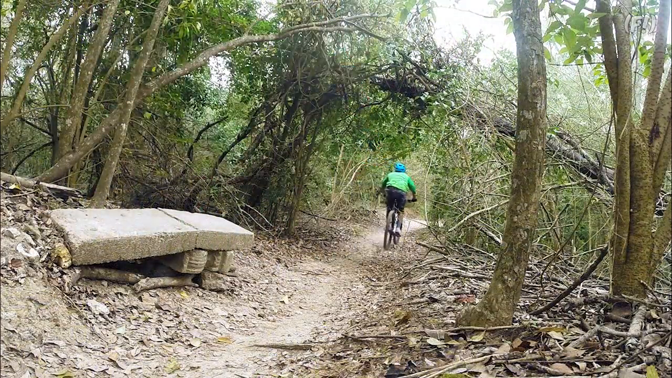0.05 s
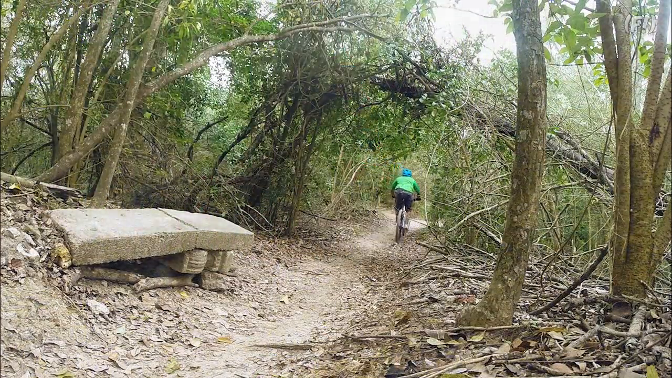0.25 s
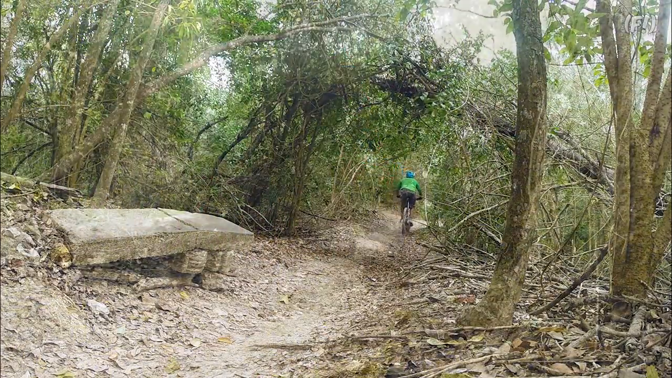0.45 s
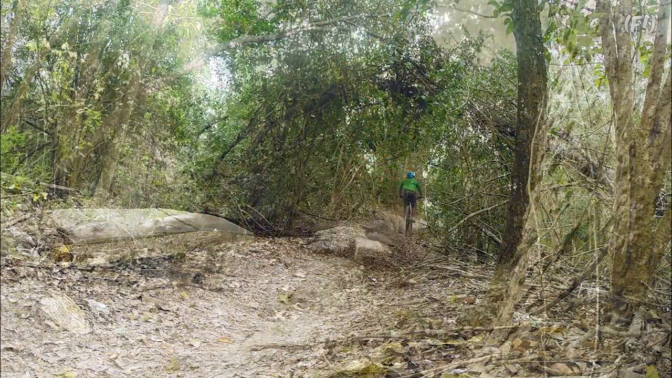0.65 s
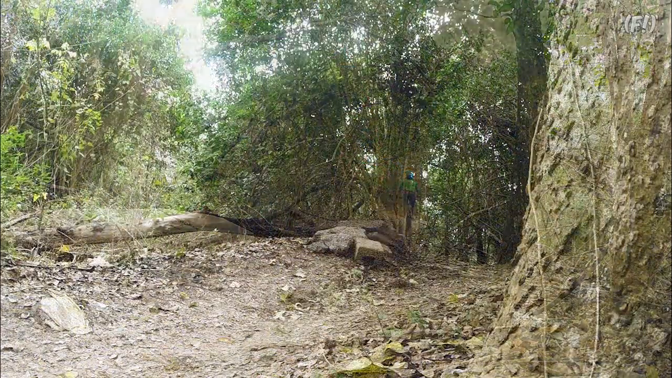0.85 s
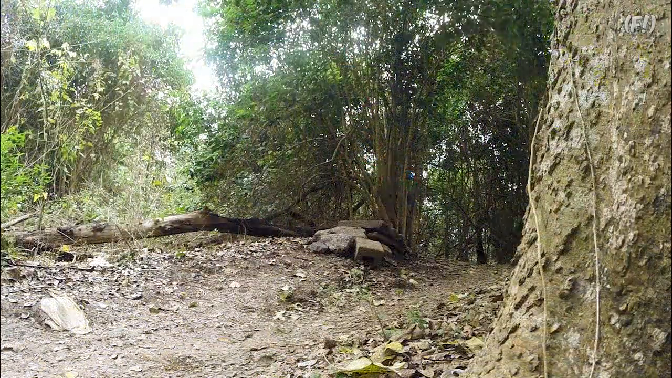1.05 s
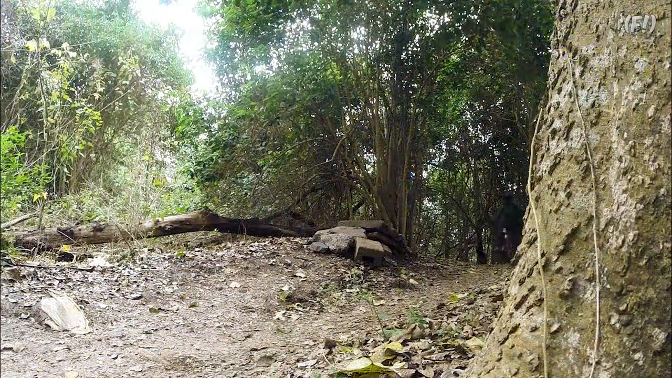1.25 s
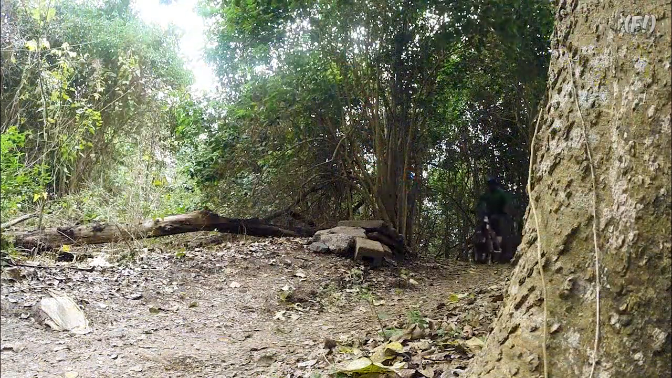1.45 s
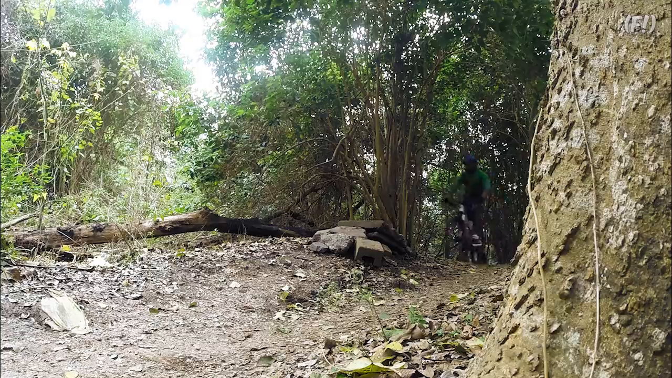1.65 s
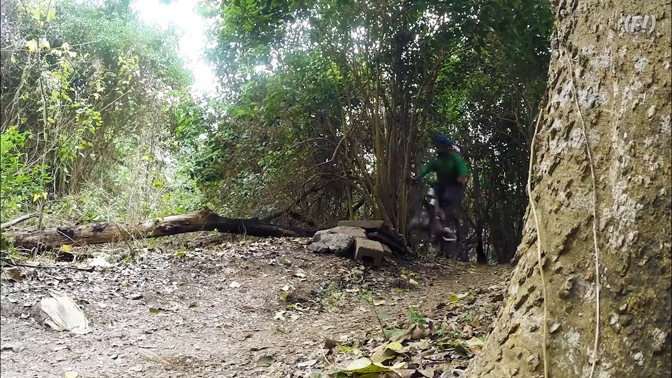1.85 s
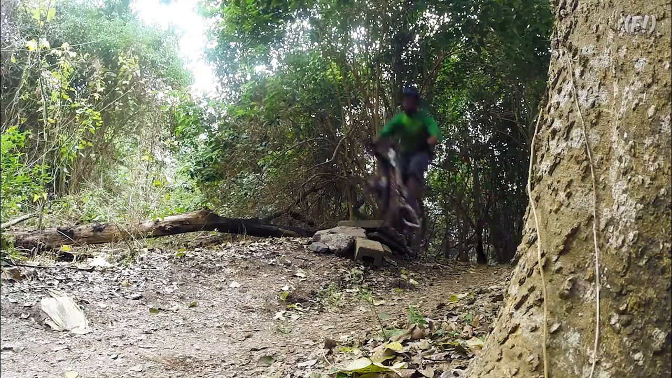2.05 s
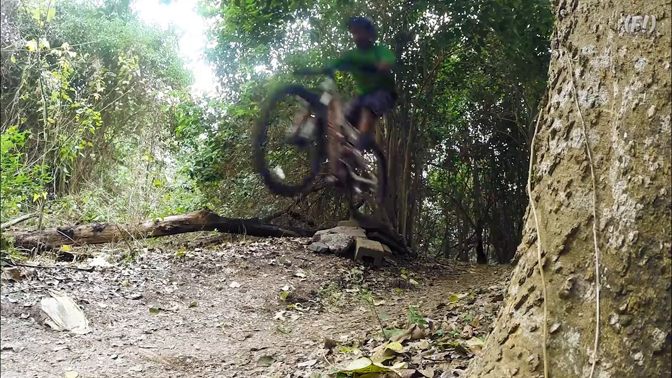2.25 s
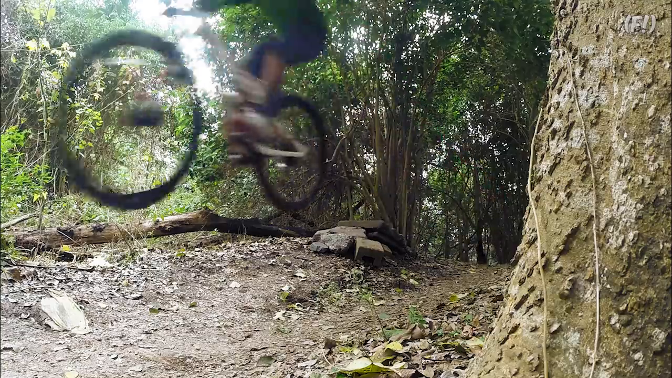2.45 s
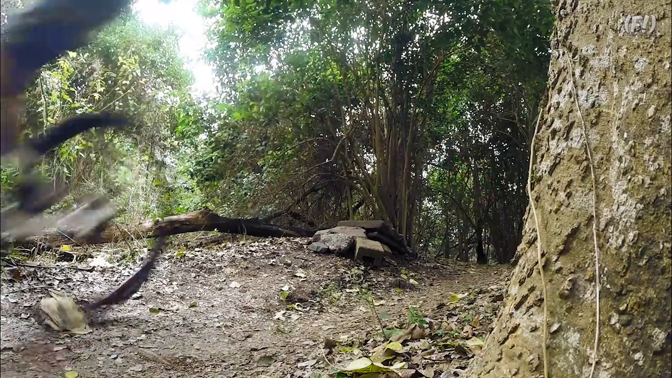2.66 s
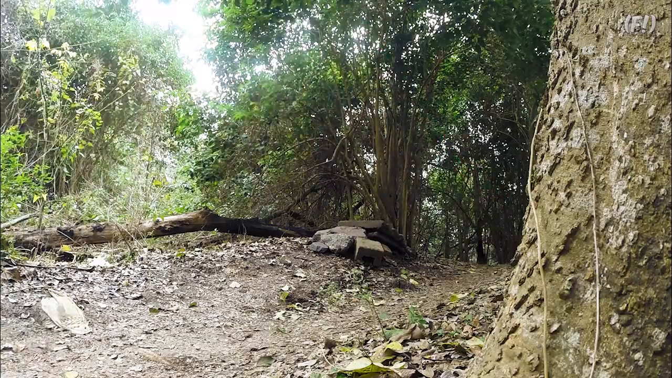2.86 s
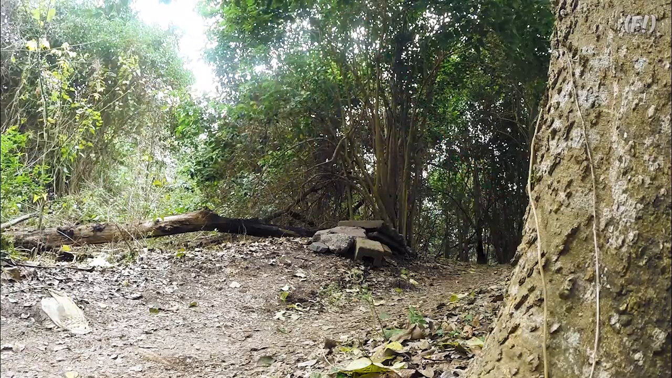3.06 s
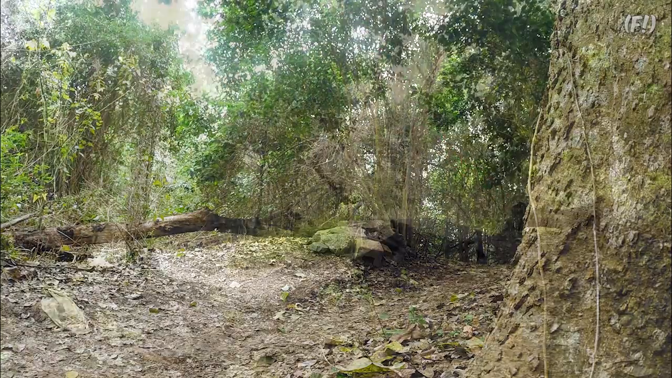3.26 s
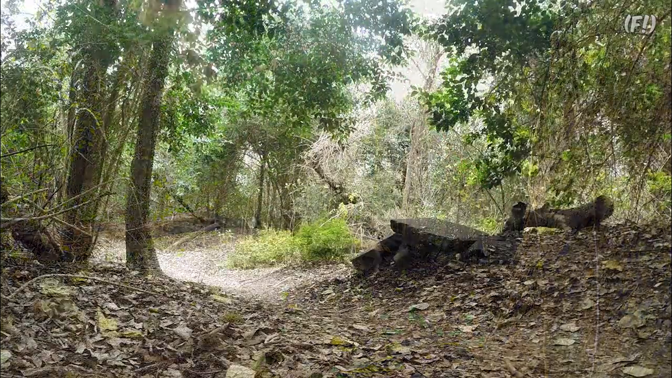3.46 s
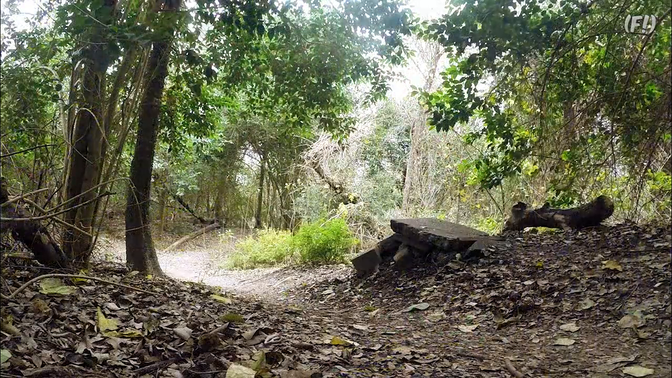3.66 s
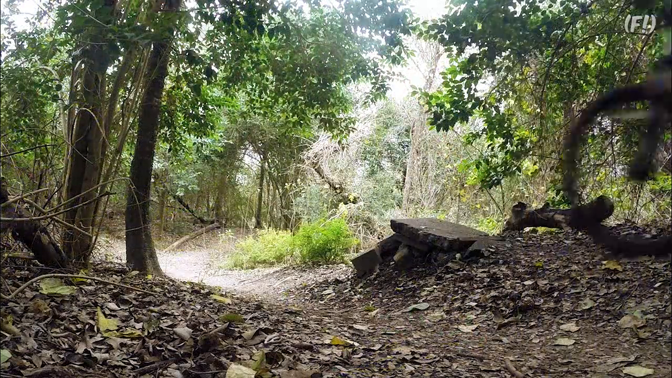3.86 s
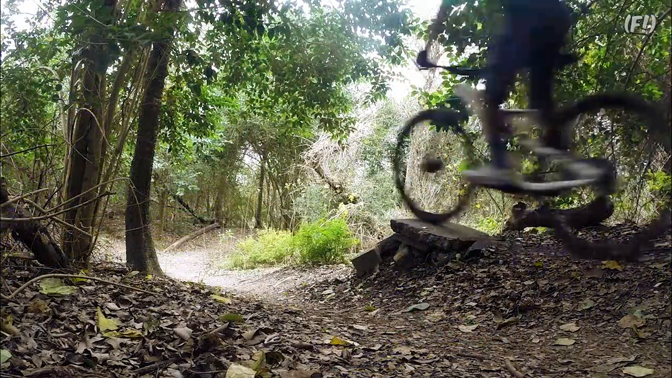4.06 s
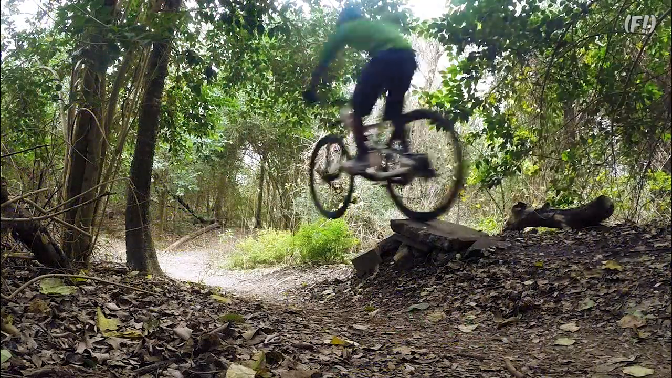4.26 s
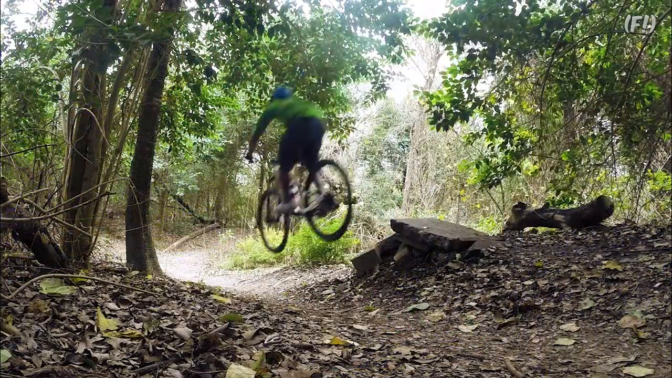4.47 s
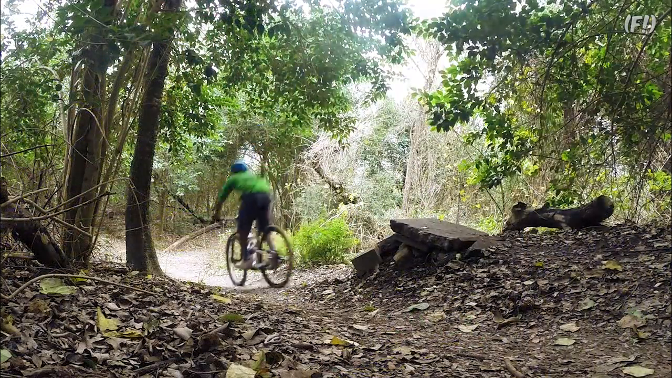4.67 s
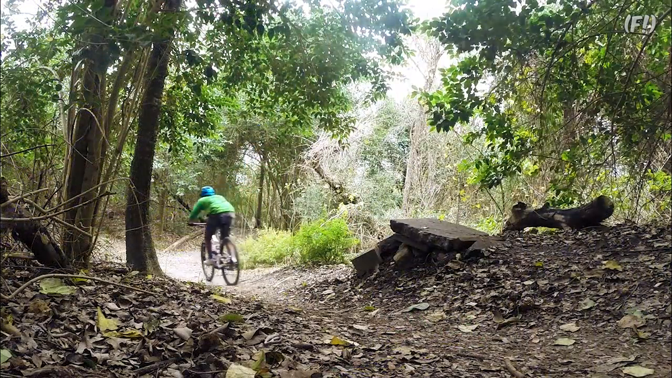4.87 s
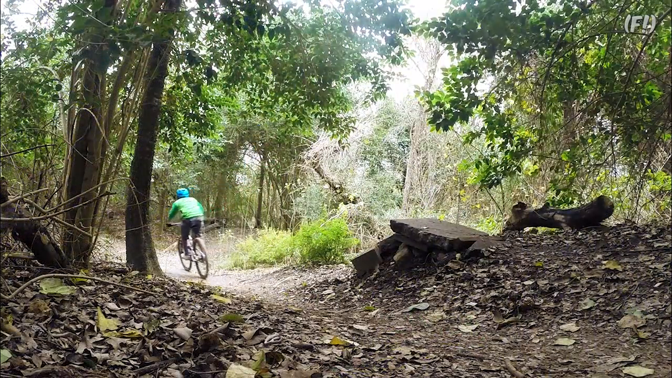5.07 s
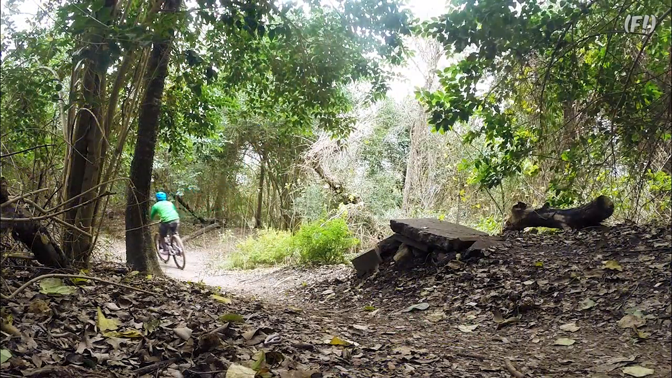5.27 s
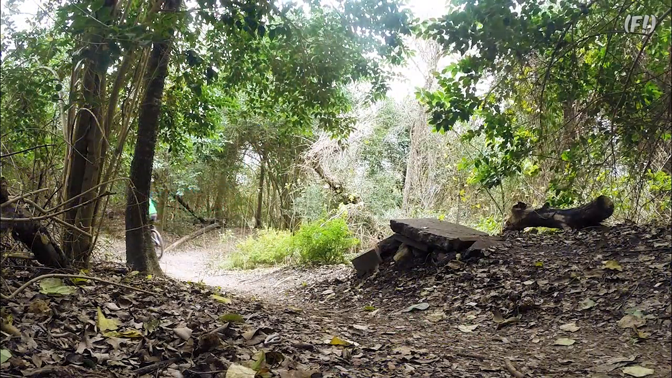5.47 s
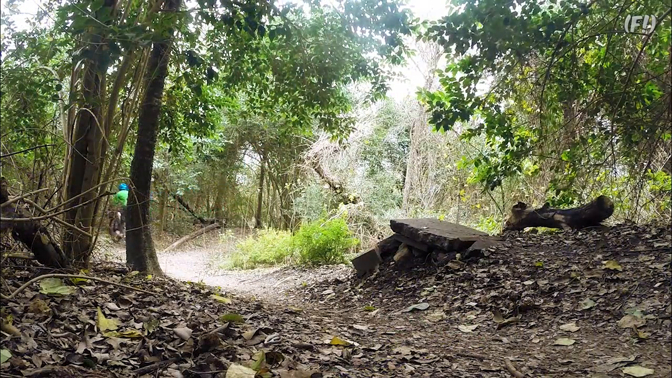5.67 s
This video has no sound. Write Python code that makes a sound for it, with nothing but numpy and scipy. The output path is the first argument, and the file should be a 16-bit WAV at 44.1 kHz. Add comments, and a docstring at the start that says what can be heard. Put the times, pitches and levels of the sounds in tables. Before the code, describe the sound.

A dry, close mono scene on a leafy dirt trail. From 0 to 0.67 s a mountain bike rolls away, its tyres drumming low with hollow knocks near 0.05, 0.38 and 0.55 s, over low air rumble and a distant engine hum. Then it turns much quieter, the hum lower and fainter, the rolling slowly nearing. At about 2.07 and 2.23 s the wheels knock lightly on a ramp; a short airborne lull follows. At 2.73-2.8 s comes the loudest event: a deep double thud, a cluster of hard knocks, chain slap and loose rattle, with further hits until 2.92 s. Tyres crunch on, the freehub ticking thinly, with a small bump at 3.3 s. Rolling nears again, knocking and rattling over a ramp at 4.06-4.3 s. After brief flight, a softer thud lands at 4.75 s, gritty litter scatters at 4.82 s, and the tyres fade away until 5.7 s.

```python
"""Mountain bike on a wooded trail

In three passages a mountain bike rides away, jumps and lands close by, then jumps again.
Filtered random impacts make the tyre drumming, crushed leaves and grit; decaying sines make wheel knocks,
landing thuds and chain slaps; a jittered pulse train makes the freehub ticks.
Behind lie shaped noise for the low rumble and hiss of the woods, a thin whine, and a far engine of two harmonics."""
import sys
import numpy as np
from scipy import signal
from scipy.fft import rfft, irfft, next_fast_len
from scipy.io import wavfile
from scipy.ndimage import uniform_filter1d, map_coordinates

SR = 44100
rng = np.random.default_rng(int(sys.argv[2]) if len(sys.argv) > 2 else 0)


def wrap_up_sound(samples):
    """Save the sound to the file named by the first command line argument, as 16-bit audio."""
    columns = np.atleast_2d(samples).T
    # keep every value between -1 and 1, then stretch to whole-number steps
    tamed = np.clip(columns, -1, 1)
    steps = np.round(tamed * 32767).astype(np.int16)
    wavfile.write(sys.argv[1], SR, steps)


N = 252233

# Rumble of the woods. Each row: time in seconds, level in dB before a slow random drift.
RUMBLE_LEVEL = [(0, -36), (.7, -44), (1.5, -44), (2.7, -43.5), (3.3, -40.5), (5.72, -40.5)]
# Noise spectra of the rumble and of the hiss. Each row: frequency in Hz, relative density in dB per Hz.
RUMBLE_SPECTRUM = [(20, -7), (40, -4.5), (68, 1.5), (110, -1), (170, -6.5), (250, -11), (330, -13),
                   (600, -25.5), (1500, -30.5), (4000, -53.5)]
HISS_SPECTRUM = [(200, -9.5), (1100, 10.5), (1700, -6.5), (3600, -4), (7000, -12.5), (9600, -18.5),
                 (10050, -14), (10600, -23), (12500, -38), (15000, -20)]
# Far engine. Each row: start in seconds, end in seconds, mean pitch in Hz, level in dB.
ENGINE_SPANS = [(0, 0.677, 156.1, -37.5), (.675, 2.72, 118.6, -46.5), (2.72, 3.38, 135, -46)]
# Echo among the trunks. Each row: frequency in Hz, time to decay by 60 dB (t60) in seconds.
TREE_DECAY = [(150, 1), (1000, 0.1), (4000, 0.98), (12000, 0.95)]
# Freehub while the rider coasts, loudest as the bike passes. Each row: time in seconds, relative level in dB.
COASTING_LEVEL = [(1.8, -70), (2.35, -53.5), (2.7, -51), (3.0, -42.5), (3.37, -46), (3.39, -50.5),
                  (4.1, -49.5), (4.5, -58), (5.7, -65)]
# Spectrum of the ratchet. Each row: frequency in Hz, relative density in dB per Hz.
RATCHET_SPECTRUM = [(3000, -4), (5500, -8), (7000, -6.5), (7700, -11.5), (8500, -6.5), (9400, -17),
                    (10250, -7), (11000, -14), (12300, -14), (15000, -18)]
# The chain striking the frame. Each row: time in seconds, level in dB, frequency of the favoured modes in Hz.
CHAIN_SLAPS = [(2.735, -34.5, 2160), (2.784, -31, 2250), (2.8454, -28, 2360), (2.8634, -19, 4750),
               (3.344, -28, 4500), (4.0602, -22.5, 3180), (4.235, -42, 3030), (4.742, -43, 2360)]
# Modes of the chain and frame. Each row: frequency in Hz, relative level in dB, t60 in seconds.
CHAIN_MODES = [(1840, 24.5, 0.003), (2450, 10.5, 0.0052), (3270, 4.5, 0.0058), (4020, -6.5, 0.018),
               (6090, 0.5, 0.016), (8240, 13, 0.0093)]
# Spectrum of the loose parts. Each row: frequency in Hz, relative density in dB per Hz.
CLATTER_SPECTRUM = [(700, -17), (1250, 2), (2000, 0), (2600, -10.5), (3300, -21), (4500, -14),
                    (7000, -21.5), (15000, -47)]
# The rider's weight coming down on a wheel. Each row: time in seconds, thump level in dB, thump pitch in Hz,
# wheel ring level in dB.
LANDING_THUDS = [(2.074, -44, 110, -28.5), (2.732, -12.5, 38, -35), (2.765, -10.5, 75, -22),
                 (2.859, -31, 95, -27), (2.917, -21, 124, -32), (3.302, -25, 120, -50),
                 (4.063, -25, 89.4, -39), (4.235, -22, 48.7, -62), (4.738, -23, 42.3, -44),
                 (4.758, -14.5, 57, -36)]
# Modes of tyre and rim. Each row: frequency in Hz, relative level in dB, t60 in seconds.
WHEEL_MODES = [(260, 0, .28), (285, -5, .15), (372, 0, .16), (465, -1, .16)]
# Stretches of rolling; the level slides evenly as the bike nears or leaves. Each row: start in seconds,
# end in seconds, first drumming level in dB, last drumming level in dB, leaves relative to it in dB,
# t60 afterwards in seconds.
ROLLING_STRETCHES = [(0, .668, -39, -44, -17, 0.029), (0.69, 2.24, -64.5, -45, -13.5, 2.12),
                     (2.74, 3.39, -33, -38, -13, 0.13), (3.375, 4.08, -44.5, -34.5, -11.5, 1.65),
                     (4.733, 5.715, -40, -53, -18, .3)]
# Bumps, ramps and landings press the tyres into the ground. Each row: time in seconds, hold in seconds,
# drumming level in dB, rattle level in dB.
TYRE_LOADS = [(0.031, 0.015, -43, -43), (.21, .035, -36.5, -68), (0.248, 0.015, -40.5, -39),
              (.315, 0.019, -39, -67), (.372, 0.033, -39, -71), (0.536, 0.029, -37, -71),
              (0.571, 0.057, -33, -61), (2.06, 0.082, -39, -63), (2.229, 0.015, -34.5, -55),
              (2.727, 0.012, -25.5, -23), (2.766, 0.16, -25, -28.5), (2.985, 0.12, -46, -46.5),
              (3.3, 0.037, -36.5, -49), (4.054, 0.077, -31.5, -47), (4.23, 0.032, -33.5, -40.5),
              (4.745, 0.13, -32, -36.5)]
# Wheels striking ramps, roots and ground. Each row: time in seconds, level in dB, pitch in Hz,
# blunt push relative to the ring in dB.
WHEEL_KNOCKS = [(.047, -14, 890, -15), (.377, -23, 710, 2), (.546, -13, 710, -18), (.583, -14, 790, -6),
                (.646, -20.5, 750, -1), (2.0743, -17.5, 320, -4), (2.082, -30, 403, -15),
                (2.110, -18.5, 420, 3.5), (2.237, -36, 640, 15.5), (2.278, -22.5, 540, -12),
                (2.726, -19.5, 1020, 9), (2.734, -12, 1300, 0), (2.738, -16, 710, 9),
                (2.7638, -7.5, 970, 7.5), (2.7742, -10.5, 373, 1.5), (2.779, -5.5, 840, -22),
                (2.794, -10, 1080, 4), (2.861, -14.5, 746, 8.5), (2.916, -13, 1030, -12),
                (2.923, -10, 1050, -14), (3.207, -20, 570, 3), (3.939, -17, 825, -31),
                (4.067, -17, 740, 11.5), (4.1066, -10.5, 880, 1.5), (4.233, -15, 1045, -3),
                (4.267, -16, 890, -15), (4.299, -9.5, 766, -1.5), (4.387, -30, 820, 5),
                (4.739, -19, 1100, 0), (4.76, -11, 1014, -2), (4.767, -23, 695, 7), (4.782, -18, 670, -11),
                (5.569, -32.5, 605, 2)]
# A tyre scuffs the ground and flings litter. Each row: time in seconds, leaves level in dB, grit level in dB,
# t60 in seconds.
TYRE_SCUFFS = [(.05, -50, -52, 0.17), (2.075, -58, -77, 0.41), (2.225, -59, -67, 0.34),
               (2.86, -68, -43.5, .39), (3.295, -63, -41, 0.19), (4.823, -45, -38.5, 0.46)]
# Spectra of tyre casing, dry leaves and grit. Each row: frequency in Hz, relative density in dB per Hz.
TYRE_SPECTRUM = [(110, -18), (190, -7), (255, 4), (350, -8), (450, -2), (530, -2.5), (620, -2), (760, -3.5),
                 (950, -2.5), (1200, -10), (1600, -25.5), (2600, -41.5), (5000, -60)]
LEAF_SPECTRUM = [(880, -17), (1500, -8), (1740, -5), (2460, -3.5), (3030, -5.5), (3510, 0), (4370, -8),
                 (6150, -14), (7000, -15), (9100, -40), (15400, -120)]
GRIT_SPECTRUM = [(2500, 7), (3600, 1.5), (5000, 3.5), (7200, 1), (9000, -5.5), (10600, -4.5), (11500, -12),
                 (15000, -30)]

TOP_HZ = 15350  # upper band limit
RELEASE_T60_S, RELEASE_PER_HOLD = 0.12, 0.83  # the longer the squash, the slower the tyre lets go
RATTLE_T60_PER_HOLD = 4.75  # and the longer chain, cables and stones keep shaking
LOAD_LEAVES_DB = -19  # leaves crushed under load, relative to the drumming
STONES_PER_S, STONE_HZ, STONE_PUSH_DB = 16, 682, -11  # mean rate, reference pitch, push relative to ring
STONE_DB, STONE_SPREAD_DB, STONE_SPREAD_OCTAVES = -0.5, 11, 0.79  # level relative to drumming; scatter
THUD_T60_S = 0.071
KNOCK_T60_S, DAMPING_DB = 0.019, -20  # ring of a free wheel; drumming level at which the load halves it
ATTACK_S, HARD_DB = 0.00086, -30  # attack time constant at this level; softer bumps swell more slowly
SCUFF_RISE_S = 0.0019


def amp(db):
    """Logarithmic level: a gain is ten to the power of decibels over twenty."""
    return 10 ** (np.asarray(db) / 20)


def unit(x):
    """Normalisation: a signal divided by its own rms has an rms of 1."""
    return x / np.sqrt(np.mean(x ** 2) + 1e-20)


def along(points, hz):
    """Logarithmic frequency: table values are interpolated evenly per octave."""
    f, value = np.transpose(points)
    return np.interp(np.log(hz + 1), np.log(f), value)


def curve(rows, axis=1):
    """Linear interpolation: one column of a time table becomes one value per sample."""
    rows = np.asarray(rows)
    return np.interp(np.arange(N) / SR, rows[:, 0], rows[:, axis])


def wobble(rate):
    """Band-limited drift: random knots, rate per second, joined by a smooth curve."""
    knots = rng.standard_normal(int(N * rate / SR) + 4)
    return map_coordinates(knots, [np.arange(N) * rate / SR])


def coloured(x, spectrum):
    """Minimum-phase filtering: folding the cepstrum gives a causal filter; the result has rms 1."""
    m = 2 * next_fast_len(N)
    gain = amp(along(spectrum, np.fft.rfftfreq(m, 1 / SR)))
    cepstrum = irfft(np.log(gain + 1e-6))
    cepstrum[1:m // 2] *= 2
    cepstrum[m // 2 + 1:] = 0
    response = np.exp(rfft(cepstrum))
    return unit(irfft(rfft(x, m) * response, m)[:N])


def grains(rate, spread_db):
    """Poisson-like process: random tiny impacts, rate per second, of unequal size and either sign."""
    size = np.clip(rng.standard_normal(N), -2, 1.5)
    happens = rng.random(N) < rate / SR
    return happens * rng.choice([-1, 1], N) * amp(spread_db * size)


def damped(hz, t60):
    """Damped oscillator: half a second of a sine that decays exponentially."""
    t = np.arange(SR // 2) / SR
    return np.sin(2 * np.pi * hz * t) * np.exp(-np.log(1000) * t / t60)


def ring(modes, scatter_db):
    """Modal superposition: an object's modes sum, struck at new strengths each time."""
    total = 0
    for hz, db, t60 in modes:
        strength = amp(db + scatter_db * rng.standard_normal()) * rng.choice([-1, 1])
        total = total + strength * damped(hz, t60)
    return total


def add(track, s, sound):
    """Linear superposition: a sound is summed into the track from s seconds on."""
    start = round(s * SR)
    track[start:start + len(sound)] += sound[:N - start]


def fade(s, db, t60, rise_s):
    """Exponential relaxation: the envelope of a burst that starts at s and dies away."""
    t = np.maximum(np.arange(N) / SR - s, 0)
    return amp(db) * (1 - np.exp(-t / rise_s)) * np.exp(-np.log(1000) * t / t60)


def held(s, hold_s, db, t60):
    """Driven relaxation: attack, hold and release; the louder, the quicker the attack."""
    t = np.maximum(np.arange(N) / SR - s, 0)
    attack_s = ATTACK_S * amp(HARD_DB - db)
    release = np.exp(-np.log(1000) * np.maximum(t - hold_s, 0) / t60)
    return amp(db) * (1 - np.exp(-t / attack_s)) * release


def trees(x):
    """Diffuse scattering: trunks and undergrowth return a short echo, modelled as decaying noise."""
    _, t, z = signal.stft(rng.standard_normal(SR // 2), SR, nperseg=256)
    hz = np.arange(len(z)) * SR / 256
    decay = np.exp(-np.log(1000) * t / along(TREE_DECAY, hz)[:, None])
    tail = signal.istft(z * decay, SR, nperseg=256)[1]
    delayed = np.pad(x, (130, 0))  # samples
    return signal.fftconvolve(delayed, tail / np.linalg.norm(tail))[:N]


def nearby(x, echo_db, reach_s=.012, count=7):
    """Interference: early copies from ground and close trunks colour the sound."""
    out = x.copy()
    for delay, side in rng.random((count, 2)):
        add(out, 0.0009 + reach_s * delay, amp(echo_db) * np.sign(side - .5) * x)
    return out / np.sqrt(1 + count * amp(2 * echo_db))


def woods():
    """Broadband noise: a drifting low rumble of the air and faint hiss, with a thin high whine."""
    rumble_gain = amp(curve(RUMBLE_LEVEL) - 0.24 + 2.2 * wobble(4))
    rumble = coloured(rng.standard_normal(N), RUMBLE_SPECTRUM) * rumble_gain
    hiss = coloured(rng.standard_normal(N), HISS_SPECTRUM) * amp(-57)
    whine_hz = 13905 + 14 * wobble(90)
    whine = unit(np.sin(2 * np.pi * np.cumsum(whine_hz) / SR)) * amp(-79)
    return rumble + hiss + whine


def drone():
    """Harmonic tone: a far engine's unsteady fundamental and octave, at its own pitch in each span."""
    out, t = np.zeros(N), np.arange(N) / SR
    for start, end, hz, db in ENGINE_SPANS:
        phase = 2 * np.pi * np.cumsum(hz * (1 + 0.0031 * wobble(6.5))) / SR
        harmonics = np.sin(phase) + amp(-14.5) * np.sin(2 * phase)
        tone = unit(harmonics * amp(0.27 * wobble(12)))
        gate = uniform_filter1d(((t >= start) & (t < end)) * 1., size=400)  # softened edges
        out += amp(db) * tone * gate
    return out


def freehub():
    """Periodic impact: pawls drop into the ratchet and chatter, some harder than others, while coasting."""
    teeth_per_s = 45 * (1 + .08 * wobble(20))
    teeth = np.diff(np.floor(np.cumsum(teeth_per_s) / SR), prepend=0)
    strikes = teeth * amp(2.5 * rng.standard_normal(N))
    decay = np.exp(-1 / (.004 * SR))  # time constant of 4 ms
    chatter = signal.lfilter([1], [1, -decay], strikes) * rng.standard_normal(N)
    ticks = coloured(chatter, RATCHET_SPECTRUM)
    return unit(ticks + 0.83 * trees(ticks)) * amp(curve(COASTING_LEVEL) - 6)


def chain(width_octaves=0.46):
    """Modal excitation: the chain whips the frame and rings; loose parts clatter on after hard blows."""
    shaking = sum(fade(s, db, RATTLE_T60_PER_HOLD * hold_s, rise_s=0.00022)
                  for s, hold_s, _, db in TYRE_LOADS)
    out = coloured(grains(460, spread_db=3.5), CLATTER_SPECTRUM) * shaking
    for s, db, bright_hz in CHAIN_SLAPS:
        # where the chain lands decides which modes speak
        modes = [(hz, level - 8 * (np.log2(hz / bright_hz) / width_octaves) ** 2, t60)
                 for hz, level, t60 in CHAIN_MODES]
        add(out, s, amp(db) * ring(modes, scatter_db=2.5))
    return out


def thuds():
    """Impulsive loading: a landing shoves the ground and sets tyre and rim booming."""
    out = np.zeros(N)
    for s, db, hz, ring_db in LANDING_THUDS:
        boom = ring(WHEEL_MODES, scatter_db=1.5)
        add(out, s, amp(ring_db) * boom - amp(db) * damped(hz, THUD_T60_S))
    return out


def contact():
    """Contact force: how hard the tyres work the ground sets the gains of drumming and crushed leaves."""
    t = np.arange(N) / SR
    drumming = sum(held(s, hold_s, db, RELEASE_T60_S + RELEASE_PER_HOLD * hold_s)
                   for s, hold_s, db, _ in TYRE_LOADS)
    crushing = drumming * amp(LOAD_LEAVES_DB)
    for start, end, first_db, last_db, leaves_db, t60 in ROLLING_STRETCHES:
        level_db = np.interp(t, [start, end], [first_db, last_db])
        roll = held(start, end - start, level_db, t60)
        # independent sounds add in power
        drumming = np.hypot(drumming, roll)
        crushing = np.hypot(crushing, roll * amp(leaves_db))
    return drumming, crushing


def stones(drumming):
    """Random collision: small stones knock as strongly as the tyres press; rows like the wheel knocks."""
    at = np.flatnonzero(rng.random(N) < STONES_PER_S / SR)
    size, pitch = rng.uniform(-1.14, 1, (2, N))[:, at]
    levels = 20 * np.log10(drumming[at] + 1e-9) + STONE_DB + STONE_SPREAD_DB * size
    pitches = STONE_HZ * 2 ** (STONE_SPREAD_OCTAVES * pitch)
    return [(i / SR, db, hz, STONE_PUSH_DB) for i, db, hz in zip(at, levels, pitches)]


def knocks(hits, drumming, contact_s=0.00026, clack_hz=2200, clack_db=-9, clack_t60=0.00087):
    """Damping by load: a blunt push, then a hollow ring that a load shortens while the rim clacks."""
    out, t = np.zeros(N), np.arange(SR // 2) / SR
    push = np.exp(-(t / contact_s - 2) ** 2)
    swell = 1 - np.exp(-t / 0.00064)
    for (s, db, hz, push_db), scatter in zip(hits, rng.standard_normal(N)):
        free = 1 / (1 + drumming[round(s * SR)] / amp(DAMPING_DB))  # 1 in the air, towards 0 under load
        t60 = KNOCK_T60_S * free
        clack = (1 - free) * damped(clack_hz * np.exp(0.12 * scatter), clack_t60)
        hollow = (damped(hz, t60) + 0.48 * damped(hz * 1.282, t60)) * swell
        add(out, s, amp(db + push_db) * (push + amp(clack_db) * clack))
        add(out, s + 3 * contact_s, -amp(db) * hollow)
    return out


def tyres(drumming, crushing, grit_db=-11):
    """Granular contact: knobs and stones drum the casing, leaves crack in clumps, scuffs spray grit."""
    clumps = wobble(70)  # uneven ground, felt by all three
    impacts = grains(1800, spread_db=4.0) * amp(1.7 * clumps)
    drum = nearby(coloured(impacts, TYRE_SPECTRUM), echo_db=-18)
    crunch = coloured(grains(2800, spread_db=4.5) * amp(1.5 * clumps), LEAF_SPECTRUM)
    spray = coloured(grains(5000, spread_db=3) * amp(clumps), GRIT_SPECTRUM)
    leaf_gain = crushing + sum(fade(s, db, t60, SCUFF_RISE_S) for s, db, _, t60 in TYRE_SCUFFS)
    grit_gain = crushing * amp(grit_db) + sum(fade(s, db, t60, SCUFF_RISE_S) for s, _, db, t60 in TYRE_SCUFFS)
    return drum * drumming + crunch * leaf_gain + spray * grit_gain


def scene():
    """Superposition of sources: the bike and its echoes sound over the background."""
    drumming, crushing = contact()
    blows = knocks(list(WHEEL_KNOCKS) + stones(drumming), drumming) + chain()
    echoed_blows = nearby(blows, echo_db=-21.5) + amp(-20.5) * trees(blows)
    bike = echoed_blows + thuds() + tyres(drumming, crushing) + freehub()
    return (bike + drone() + woods())[None]


def record(dry):
    """Band limiting: every component at or above the top frequency is removed."""
    m = next_fast_len(N + SR // 2)
    keep = np.fft.rfftfreq(m, 1 / SR) < TOP_HZ
    return irfft(rfft(dry, m) * keep, m)[:, :N]


dry = scene()
out = record(dry)
wrap_up_sound(out)
```